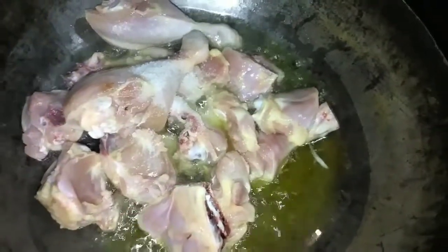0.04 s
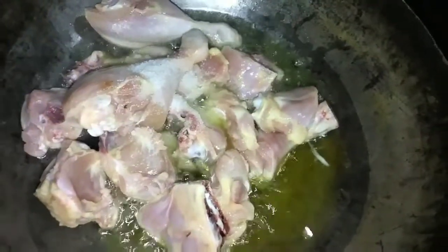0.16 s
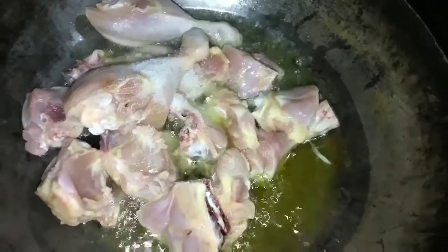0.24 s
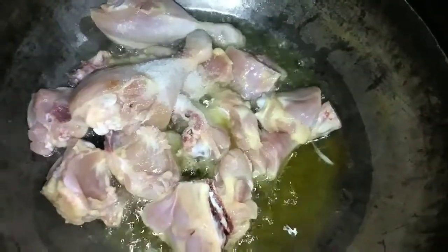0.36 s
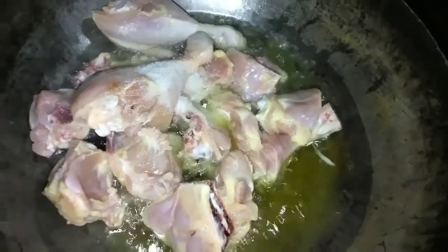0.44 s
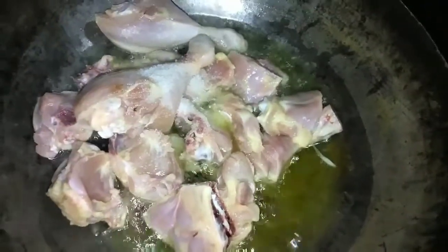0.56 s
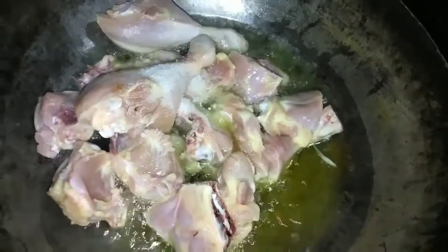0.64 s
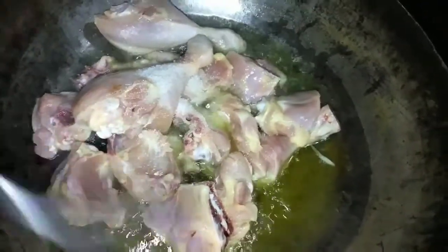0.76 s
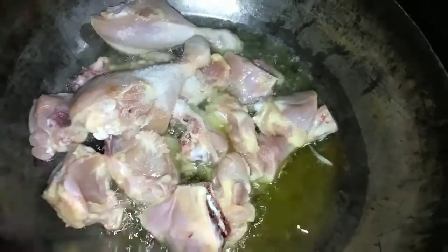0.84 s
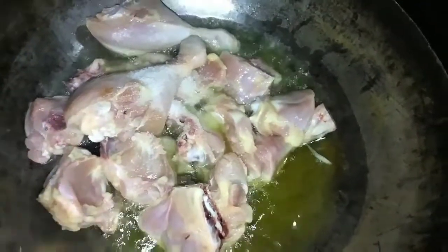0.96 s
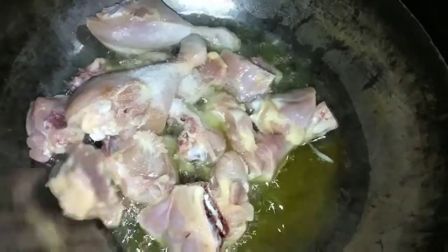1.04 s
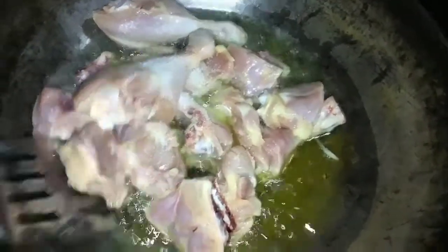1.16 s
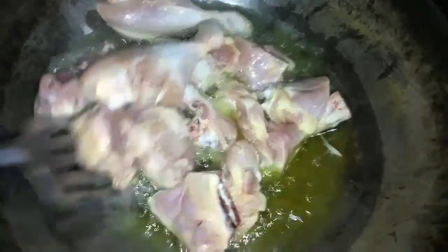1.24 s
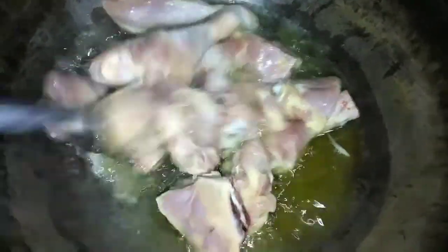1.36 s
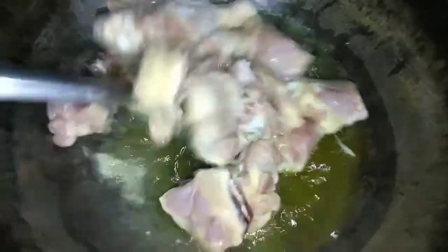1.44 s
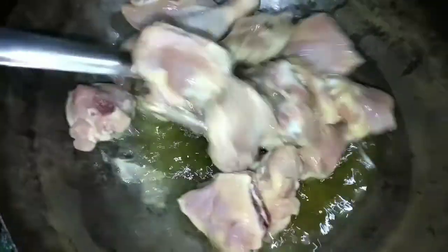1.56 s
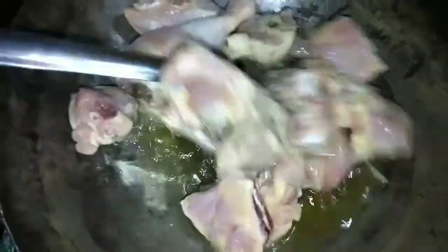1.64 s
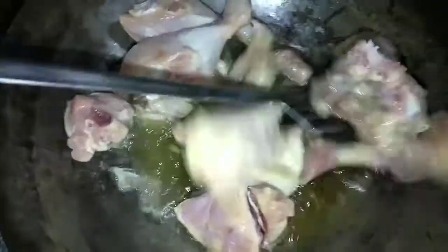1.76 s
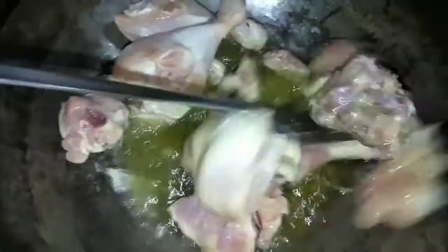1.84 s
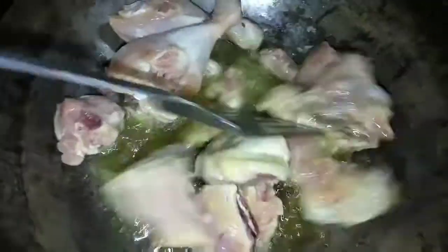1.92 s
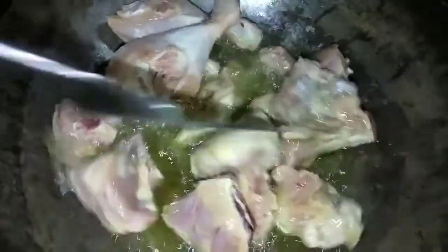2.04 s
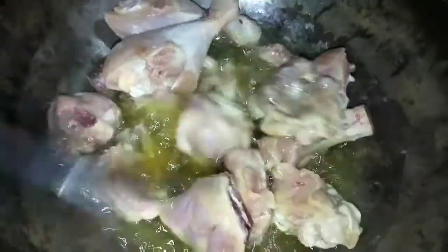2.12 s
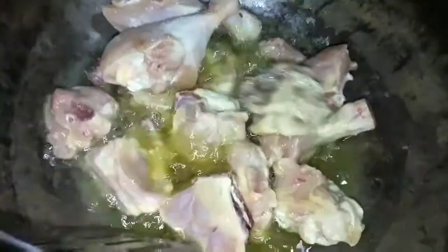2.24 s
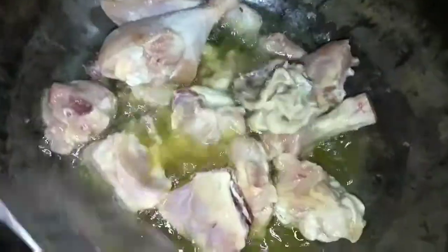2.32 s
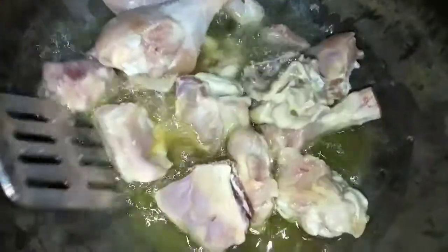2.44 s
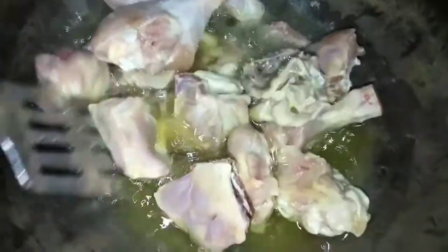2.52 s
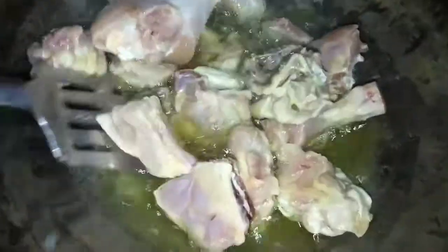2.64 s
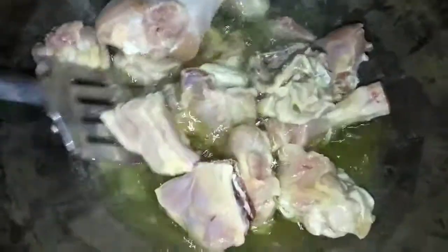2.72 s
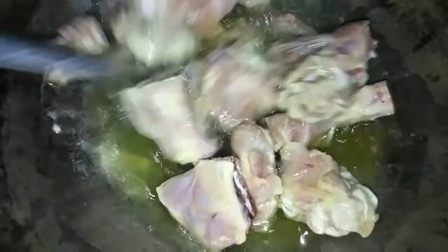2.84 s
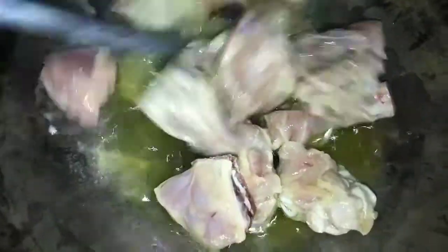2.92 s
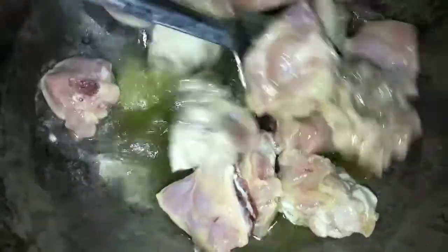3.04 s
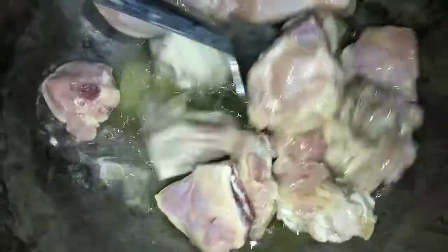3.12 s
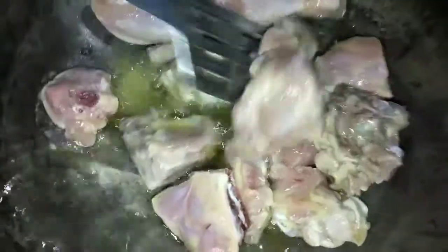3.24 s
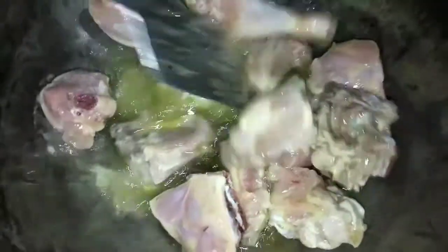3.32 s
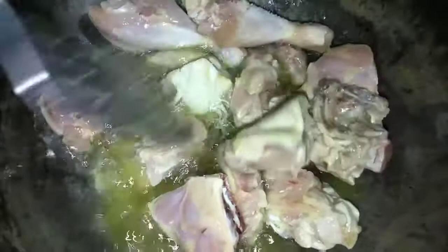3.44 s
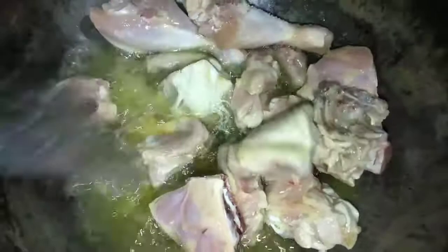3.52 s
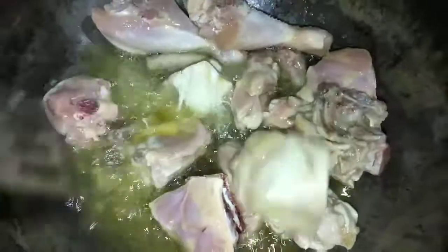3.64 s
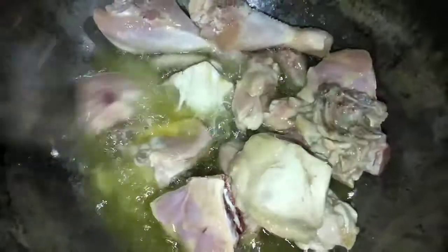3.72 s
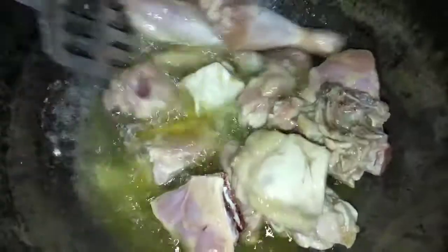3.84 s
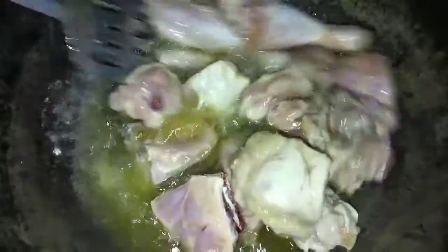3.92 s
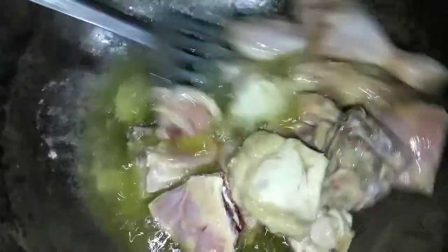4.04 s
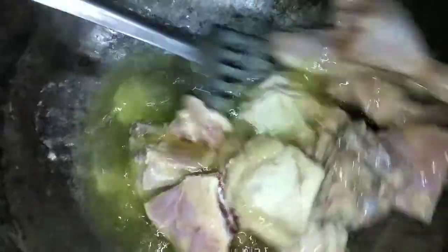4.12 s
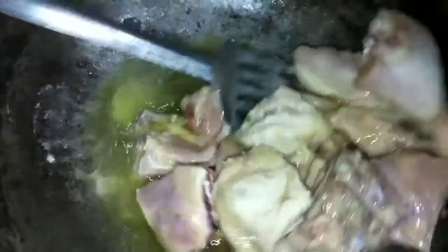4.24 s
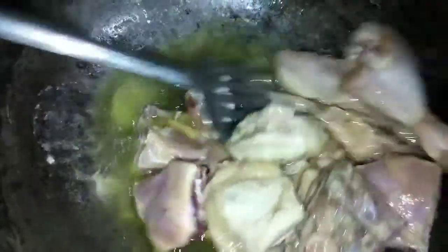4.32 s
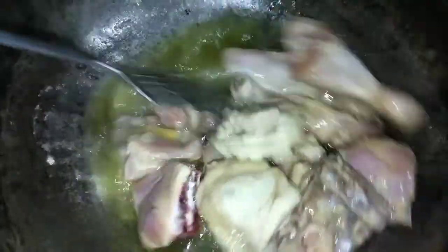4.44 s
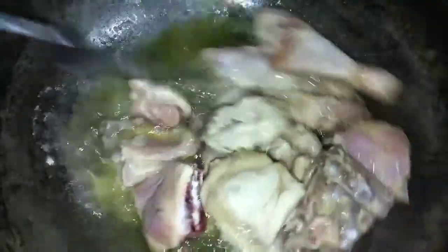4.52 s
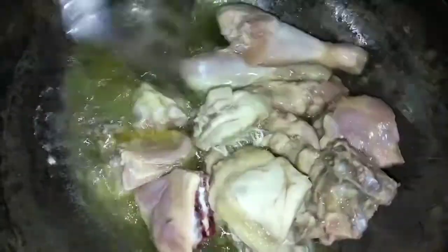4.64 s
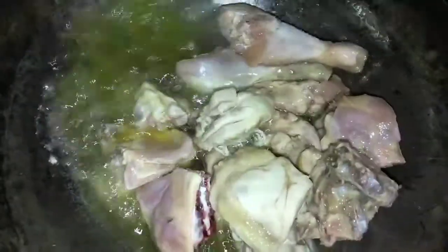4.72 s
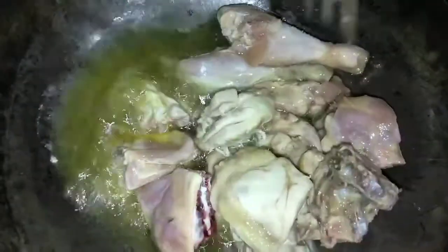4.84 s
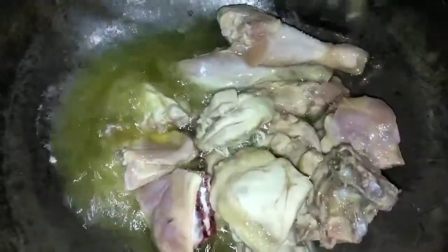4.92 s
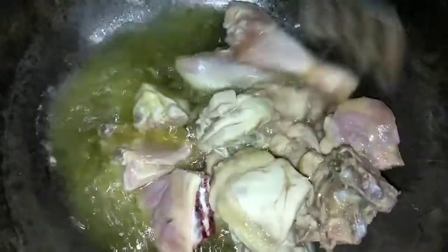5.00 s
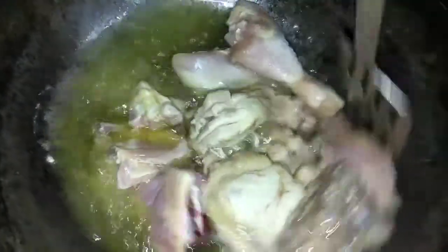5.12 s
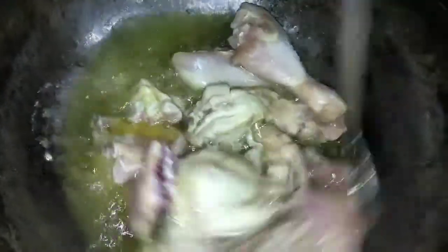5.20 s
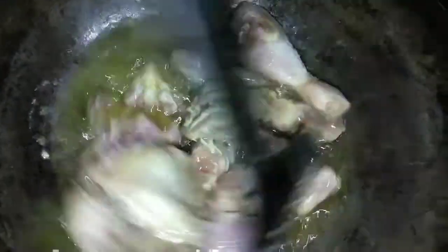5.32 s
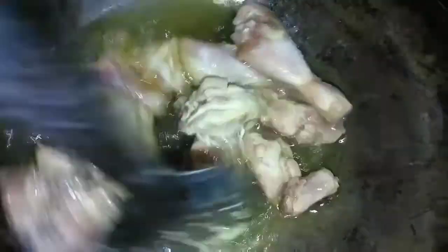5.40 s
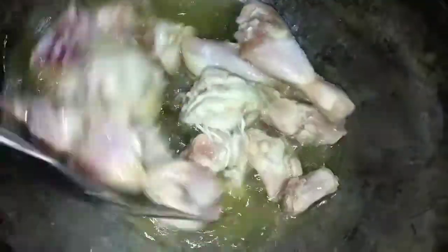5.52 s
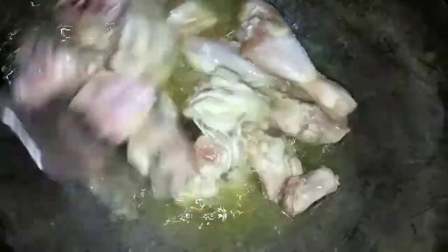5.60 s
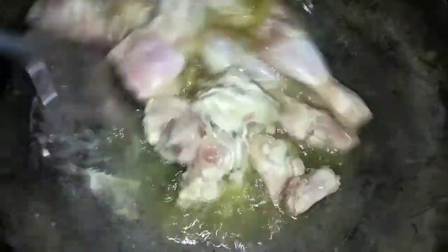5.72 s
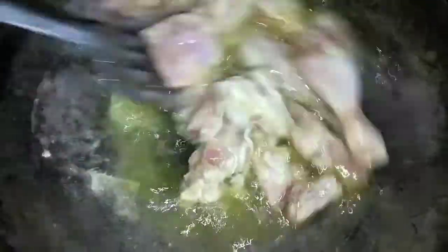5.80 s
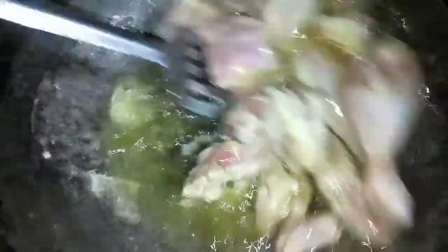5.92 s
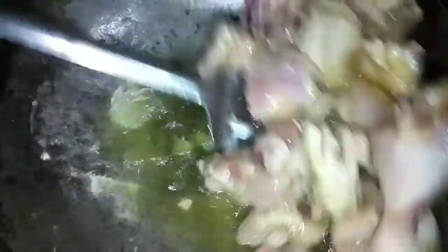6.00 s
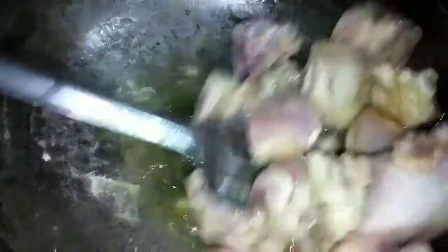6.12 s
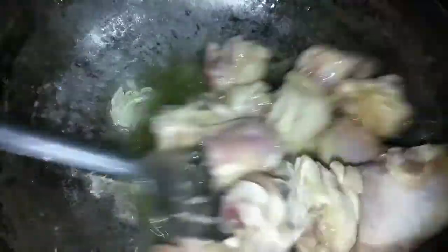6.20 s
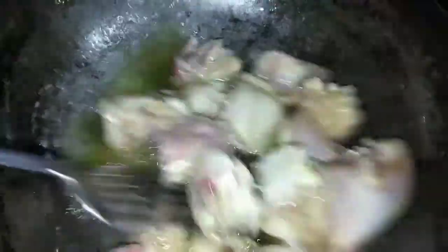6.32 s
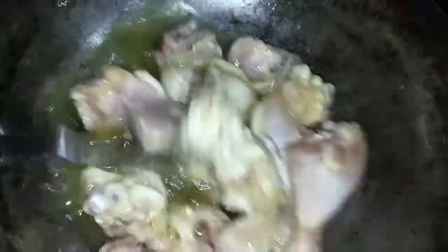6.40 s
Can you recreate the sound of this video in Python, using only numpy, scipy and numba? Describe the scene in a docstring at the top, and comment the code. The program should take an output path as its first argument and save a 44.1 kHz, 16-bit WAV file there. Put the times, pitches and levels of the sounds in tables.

```python
"""Hot fat sizzles around chicken pieces in an iron pan, heard from close above in a kitchen.
Steam bubbles burst densely, water spits, and big bubbles boil up as the pieces are turned.
A steel spatula knocks, scrapes and squeaks, ringing the iron low and its own thin blade high.
A burner roars faintly underneath. Only the treble spreads left and right."""
import sys
import numpy as np
from scipy import signal
from scipy.fft import rfft, irfft
from scipy.io import wavfile
from scipy.ndimage import uniform_filter1d
from numba import njit

SR = 44100
rng = np.random.default_rng(int(sys.argv[2]) if len(sys.argv) > 2 else 0)


def unload_wav(signal):
    """Save mono or channel-first audio to the path in sys.argv[1] as 16-bit WAV at rate SR, clipped to [-1, 1]."""
    wavfile.write(
        sys.argv[1],
        SR,
        np.round(np.clip(np.atleast_2d(signal).T, -1, 1) * 32767).astype(np.int16),
    )


N = 284886


# Spectrum of frying fat: (frequency [Hz], gain [dB])
FAT_SPECTRUM = [(150, -27.5), (250, -16.5), (420, -8), (700, -7.5), (1100, -1.5), (1500, -2), (2200, -0.5),
                (3000, -3), (4300, -4.5), (5000, -6.5), (7400, -8), (8600, -15.5), (12300, -8),
                (13400, -14)]

def fat():
    """Steam hiss, tiny crackles and bubbles of all sizes, alone and in flurries."""
    swarm = unit(bubbles(2500, lambda i, u: 700 + 11000 * u ** 1.298, cycles=3.15))
    frying = rng.standard_normal(N) + undb(-8.5) * grit(1500, 1.3) + undb(-5.5) * swarm
    return unit(colour(frying, FAT_SPECTRUM)) + undb(-8.5) * unit(colour(flurries(), FAT_SPECTRUM))


def flurries(per_s=60, bubbles_each=24, mean_delay_s=.012, low_hz=3300, high_hz=12460):
    """Droplets boil off in clusters of like-sized bubbles; a few clusters are much louder."""
    when, pitch, strength = rng.random((int(per_s * N / SR), 3, 1)).swapaxes(0, 1)
    delay, detune, share = rng.random((len(when), 3, bubbles_each)).swapaxes(0, 1)
    start = when * N - mean_delay_s * SR * np.log(1 - delay)
    hz = low_hz * (high_hz / low_hz) ** pitch * np.exp(.06 * (2 * detune - 1))
    size = (1.05 - strength) ** -.5 * share * hz / SR
    return burst(start.astype(np.int64).ravel(), hz.ravel(), np.full(hz.size, 7.), size.ravel())


# Course of the sizzle: (time [s], body [dB], small bubbles [dB], medium bubbles [dB], spatter [dB])
SIZZLE_LEVELS = [(0.0, -33.5, 3, 12.5, -48), (0.21, -32, 3.5, 10.5, -48.5), (1.1, -33, 5.5, 14.5, -49.5),
                 (1.42, -33, 5.5, 13, -48.5), (1.8, -28.5, 1.5, 7, -48), (2.2, -32.5, 4, -5, -47),
                 (2.24, -38, 5, 14.5, -50), (2.37, -36.5, 8, 12, -49), (2.43, -33.5, 8.5, 12, -49),
                 (2.64, -32.5, 6, 10.5, -44), (3.0, -30.5, 4, 2, -44), (3.42, -31.5, 2, 4.5, -43),
                 (3.79, -32.5, 1.5, 6, -50.5), (4.14, -32.5, 4.5, 7, -42), (4.6, -34.5, 8, -6, -40),
                 (4.68, -33.5, 2.5, -8, -50), (5.12, -33, 2, -2, -48), (5.79, -31, 9.5, 15, -43.5),
                 (6.2, -33.5, 4, 0, -43.5), (6.46, -33.5, 3, -13, -40.5)]
# Favoured bubble sizes, large to small: (pitch [Hz], spread [log ratio], level [dB])
BUBBLE_SIZES = [(1916, 0.104, -20.5), (3752, 0.078, -17), (6230, 0.047, -10.5)]

def sizzle(surge_db, spurt_db, flicker_db):
    """A surging body of bursting bubbles, topped by fine spatter that the spatula's rasp adds to."""
    body_db, small_db, medium_db, spatter_db = curves(SIZZLE_LEVELS)
    frying = fat()
    body, spatter = butter(frying, 4, 8200, "low"), butter(frying, 4, 8200, "high")
    finest = signal.sosfiltfilt(signal.butter(2, 10800, "high", fs=SR, output="sos"), spatter)
    spatter = spatter + (undb(flicker_db) - 1) * finest
    for (hz, spread, size_db), course_db in zip(BUBBLE_SIZES, (0, medium_db, small_db)):
        drift = .02 * walk(5)
        swarm = bubbles(1200, lambda i, u: hz * np.exp(spread * (4 * u - 2) + drift[i]), cycles=16)
        body = body + unit(swarm) * undb(size_db + course_db + 1.5 * walk(22) + .7 * walk(10))
    body_gain = undb(body_db + surge_db + .27 * spurt_db)
    spatter_gain = np.hypot(undb(spatter_db), drags(RASP)) * undb(spurt_db)
    return body * body_gain + unit(spatter) * spatter_gain


def spurts(per_s=22, decay_s=.012):
    """Gain in dB of spatter that leaps up at random and dies away."""
    kicks = (rng.random(N) < per_s / SR) * rng.random(N)
    gain = 1 + undb(-3) * signal.lfilter([1], [1, -np.exp(-1 / (decay_s * SR))], kicks)
    return 20 * np.log10(gain / np.mean(gain))


def bubbles(per_s, pitch_hz, cycles):
    """Bubbles at random times, tuned by pitch_hz(start sample, uniform draw)."""
    when, pitch, damping, strength = rng.random((int(per_s * N / SR), 4)).T
    start = (when * N).astype(np.int64)
    hz = pitch_hz(start, pitch)
    size = (1.01 - strength) ** -.3 * np.sqrt(hz / cycles)
    return burst(start, hz, cycles * (.12 + damping), size)


@njit
def burst(start, hz, cycles, size):
    """Each bubble rings as a sine that falls to 1/e in its number of cycles."""
    out = np.zeros(N)
    for k in range(len(start)):
        step = np.exp((2j * np.pi - 1 / cycles[k]) * hz[k] / SR)
        phasor = size[k] + 0j
        for i in range(start[k], min(N, start[k] + int(6 * cycles[k] * SR / hz[k]))):
            out[i] += phasor.imag
            phasor *= step
    return out


# Water pops: (time [s], level [dB], pitch [Hz])
WATER_POPS = [(0.2044, -17, 2250), (0.2514, -13, 4310), (0.2965, -31, 500), (0.3247, -18, 3550),
              (0.3844, -16, 5830), (0.4404, -17, 3660), (0.4584, -16, 3480), (0.6155, -21, 1700),
              (0.6504, -17, 6280), (0.686, -21, 1600), (1.2214, -14, 6640), (1.3169, -15, 3580),
              (1.5664, -13, 1960), (1.7345, -12, 1000), (1.8352, -13, 3850), (1.9124, -15, 3390),
              (1.9969, -14, 5990), (2.8739, -13, 2960), (2.9494, -16, 6080), (3.0494, -12, 1690),
              (3.1194, -15, 1300), (3.1894, -15, 1110), (3.3844, -16, 6030), (4.3744, -16, 6380),
              (4.5324, -16, 1870), (5.5184, -16, 1150)]

def spits():
    """Single loud pops of water in the fat."""
    time_s, db, hz = np.transpose(WATER_POPS)
    pops = burst((time_s * SR).astype(np.int64), hz, np.full(len(hz), 1.6), undb(db))
    return butter(pops, 2, 250, "high")


# Bubbling, one curve per turn of the pieces: (time [s], level [dB], pitch [Hz])
TURNS = [
    [(1.4, -43, 1900), (1.5, -32, 1980), (1.59, -28.5, 1800), (1.615, -25, 1330), (1.67, -30, 1190),
     (1.74, -33.5, 1140), (1.81, -34.5, 1270), (1.9, -35.5, 1080), (1.97, -40.5, 1170), (2.2, -56, 1270)],
    [(2.7, -49, 1710), (2.8, -34, 1870), (2.87, -31, 2690), (2.91, -34, 2500), (2.95, -31.5, 2520),
     (2.975, -36, 2380), (3.01, -30, 2250), (3.07, -31, 1730), (3.14, -33, 1010), (3.21, -32, 1040),
     (3.24, -33, 1900), (3.28, -32, 2300), (3.36, -36, 2700), (3.46, -39, 2950), (3.55, -50, 3000)],
    [(4.15, -36, 1230), (4.22, -36.5, 1110), (4.36, -39.5, 990), (4.45, -41, 970)],
    [(5.25, -36, 1170), (5.35, -34, 1140), (5.5, -33, 1127), (5.6, -41, 1470), (5.7, -35, 2690),
     (5.755, -39, 2600), (5.79, -33, 2640), (5.89, -28.5, 2760), (5.97, -33.5, 2500), (6.04, -33.5, 1280),
     (6.2, -41, 1260)],
]

def boil():
    """Big wet bubbles glide in pitch as the pieces roll over."""
    t = np.arange(N) / SR
    turning = sum((t >= turn[0][0]) & (t <= turn[-1][0]) for turn in TURNS)
    gate = uniform_filter1d(turning * 1., size=900)
    db, hz = curves(np.vstack(TURNS))
    swarm = unit(bubbles(1000, lambda i, u: hz[i] * np.exp(.3 * (2 * u - 1)), cycles=8))
    return butter(swarm * gate * undb(db + .93 * walk(35)), 2, 480, "high")


# Spatula blows: (time [s], tick [dB], pan [dB], deep ring [dB], blade [dB], clatter decay [s])
SPATULA_BLOWS = [(1.148, -10, -23, -33, -24, 0.0013), (1.17, -17, -53, -36, -30, 0.004),
                 (1.329, -34, -53, -60, -34, 0.0069), (1.814, -28, -50, -60, -32, .006),
                 (1.996, -28, -52, -60, -35, .006), (2.177, -28, -38, -56, -45, .0023),
                 (2.214, -17, -47, -58, -39, .002), (2.459, -22, -28, -31, -40, 0.0019),
                 (2.462, -34, -33, -36, -40, 0.035), (2.471, -17, -52, -58, -30, .0013),
                 (2.66, -21, -35, -46, -41, 0.0026), (2.947, -24, -43, -60, -38, 0.0033),
                 (3.277, -28, -36, -55, -50, .0036), (3.8136, -15, -27.5, -33, -17, 0.0025),
                 (3.823, -18, -34, -38, -22.5, 0.003), (3.83, -19, -41, -43, -37, .012),
                 (3.916, -26, -50, -56, -28.5, .006), (4.163, -31, -48, -62, -36, 0.0032),
                 (5.137, -25, -43, -33, -25, 0.0039), (5.206, -32, -59, -63, -41, 0.0051),
                 (5.772, -27, -37, -60, -34, 0.0025)]
TICK, PAN_HIT, DEEP_HIT, BLADE_HIT = range(1, 5)

def blows(column, decay_s=None, solid=False):
    """A jagged or solid push per blow, dying over decay_s or else its own clatter time."""
    force, n = np.zeros(N), 4000
    for blow in SPATULA_BLOWS:
        start, noise = int(blow[0] * SR), rng.standard_normal(n)
        texture = 1 if solid else noise + np.sign(noise)
        decay = np.exp(-np.arange(n) / ((decay_s or blow[5]) * SR))
        force[start:start + n] += undb(blow[column]) * texture * decay
    return force


# Spatula drags: (time [s], length [s], iron [dB], patch start [Hz], patch end [Hz],
# deep ring [dB], blade [dB], stem [dB], rasp [dB], brush [dB])
SPATULA_DRAGS = [(1.144, 0.05, -42, 1850, 1900, -42, -28.5, -43, -39, -48),
                 (1.197, 0.064, -47, 1900, 2020, -41, -29.5, -37, -44, -51),
                 (1.45, 0.15, -34, 1900, 1800, -72, -40.5, -37, -54, -48),
                 (1.591, 0.076, -26, 1700, 1900, -66, -38, -40, -50, -41),
                 (1.672, 0.086, -35, 1300, 1200, -69, -47, -39.5, -54, -52),
                 (1.783, 0.052, -35.5, 1280, 1280, -62, -51, -49, -56, -50),
                 (1.833, 0.084, -44, 1250, 1050, -59, -40, -35, -46, -48),
                 (1.943, 0.27, -62, 1600, 1800, -60, -43.5, -39.5, -50, -45),
                 (2.443, 0.049, -32.5, 1020, 1210, -37, -40, -53, -49, -52),
                 (2.498, 0.052, -42, 1800, 1900, -58, -29.5, -36, -40, -40),
                 (2.565, 0.038, -36.5, 2000, 2060, -58, -33.5, -33.5, -43, -43),
                 (2.674, 0.17, -37.5, 1730, 1800, -68, -48, -42.5, -54, -45),
                 (2.866, 0.13, -42, 2600, 2300, -68, -45, -42, -40.5, -37),
                 (2.981, 0.12, -40, 2250, 1650, -68, -37.5, -45, -43, -42),
                 (3.102, 0.092, -32, 1080, 1270, -67, -38, -44, -48, -44),
                 (3.298, 0.12, -41, 1100, 1050, -66, -40, -45, -44, -56),
                 (3.807, 0.065, -32, 920, 920, -49, -41, -53, -48, -55),
                 (3.904, 0.04, -47, 1900, 2000, -64, -30, -48, -37, -46),
                 (3.94, 0.07, -44, 1900, 1900, -64, -27, -40, -37, -45),
                 (4.14, 0.092, -33, 1820, 1820, -61, -32.5, -39.5, -50, -42),
                 (4.228, 0.043, -39, 1150, 1050, -63, -32, -37, -42, -45),
                 (4.271, 0.089, -38, 1050, 990, -70, -35, -43, -45, -44),
                 (4.492, 0.11, -37, 1290, 1600, -70, -36.5, -43.5, -55, -51),
                 (5.113, 0.11, -53, 1400, 1290, -50, -33, -50, -40, -45),
                 (5.23, 0.28, -38, 1010, 940, -45, -43, -64, -47, -53),
                 (5.46, 0.22, -34, 940, 1510, -35, -35.5, -43.5, -52, -43),
                 (5.678, 0.075, -39, 1500, 1930, -49, -31.5, -37, -46, -39),
                 (5.769, 0.095, -37, 1990, 1990, -56, -36, -37, -40, -38),
                 (5.859, 0.13, -36.5, 1990, 2010, -63, -32, -38, -38.5, -36),
                 (5.99, 0.068, -45, 1950, 2000, -65, -42, -43, -50, -50),
                 (6.057, 0.1, -40.5, 1160, 1130, -69, -37, -41, -40, -46)]
IRON, DEEP_RING, CHATTER, STEM, RASP, BRUSH = 2, 5, 6, 7, 8, 9

def drags(column, grip_s=.023, release_s=.012):
    """Gain of one layer as the edge bites, holds and lets go."""
    t = np.arange(0, N, 32) / SR
    gain = np.zeros(len(t))
    for drag in SPATULA_DRAGS:
        age_s = t - drag[0]
        release = np.exp(-np.maximum(age_s - drag[1], 0) / release_s)
        gain += undb(drag[column]) * np.clip(age_s / grip_s, 0, 1) * release
    return np.interp(np.arange(N) / SR, t, gain)


# Iron pan modes, middle and lowest: (frequency [Hz], level [dB], t60 [s])
PAN_MODES = [(623, -6.5, 0.075), (745, -6, 0.052), (853, -1, 0.11), (1000, -4, 0.15), (1129, -3.5, 0.13),
             (1286, -9.5, 0.029), (1405, -21, 0.18), (1474, -8, 0.074), (1580, -36, 0.021),
             (1798, -3.5, 0.051), (1907, 0, 0.081), (2020, -4.5, 0.071), (2127, -3, 0.087),
             (2290, -3.5, 0.054), (2785, -4.5, 0.089), (2867, -3.5, 0.051)]
DEEP_MODES = [(409, 0, .2), (428, -1, .14), (452, -3, .11), (315, -13, .07), (155, -11, .25)]

def pan():
    """Blows and stick-slip ring the iron, most in the modes near the pitch of the touched patch."""
    patch_path = []
    for time_s, length_s, _, from_hz, to_hz, *_ in SPATULA_DRAGS:
        patch_path += [(time_s, from_hz), (time_s + length_s, to_hz)]
    patch_hz, = curves(patch_path)
    shares = np.array([undb(db) * (np.exp(-.5 * (np.log(hz / patch_hz) / .1) ** 2) + .22)
                       for hz, db, _ in PAN_MODES])
    shares /= np.sqrt(np.sum(shares ** 2, axis=0))
    slip = drags(IRON) * grit(3000, 2) * undb(.62 * walk(45))
    knock = blows(PAN_HIT)
    iron = np.zeros(N)
    for share, (hz, db, t60_s) in zip(shares, PAN_MODES):
        scrape = share * slip * undb(1.04 * walk(30))  # wavers as the edge crosses nodes
        iron += mode(scrape + (share + .28 * undb(db)) * knock, hz, t60_s)
    deep_force = grit(3000, 1) * drags(DEEP_RING) + blows(DEEP_HIT, decay_s=.00034, solid=True)
    return butter(iron, 2, 450, "high") + butter(ring(deep_force, DEEP_MODES), 2, 125, "high")


# Spatula blade and stem modes: (frequency [Hz], level [dB], t60 [s])
BLADE_MODES = [(4950, -7, .015), (5170, -6, .015), (5590, -4, .02), (5830, -3, .02), (6150, 0, .03),
               (6330, -2, .02), (6500, -2, .02), (6720, -2, .02), (7060, -3, .02), (7340, -3, .025),
               (7650, -5, .02), (8020, -8, .015)]
STEM_MODES = [(3530, -2, .012), (3700, 0, .016), (3900, -2, .012), (4200, -4, .012)]

def spatula(shake_db):
    """Thin steel chatters and hisses as it drags, and rings at each blow."""
    slip = grit(7000, .35) * undb(shake_db)
    chatter = unit(sum(undb(db + 3.5 * walk(20)) * mode(slip, hz, t60_s)
                       for hz, db, t60_s in BLADE_MODES))
    brush = unit(butter(slip, 3, (4450, 5720), "band"))
    stem = ring(slip * drags(STEM), STEM_MODES)
    hit = blows(BLADE_HIT)
    spray = undb(-6) * butter(hit, 3, 8000, "high")
    return drags(CHATTER) * chatter + drags(BRUSH) * brush + stem + ring(hit, BLADE_MODES) + spray


def ticks():
    """The dry crack of steel meeting iron."""
    return butter(blows(TICK, decay_s=.0004), 2, (700, 4500), "band")


# Metal squeaks: (time [s], level [dB], start pitch [Hz], end pitch [Hz], length [s])
EDGE_SQUEAKS = [(1.243, -25, 2060, 1990, 0.046), (1.225, -29, 7200, 7140, 0.031),
                (1.471, -26.5, 1924, 1735, 0.037), (1.504, -26, 2710, 2680, 0.018),
                (1.515, -22.5, 1520, 1450, .016), (1.535, -26.5, 1996, 1995, 0.047),
                (1.599, -27, 1910, 1990, 0.03), (1.625, -29.5, 2066, 2000, 0.041),
                (1.785, -29, 1304, 1270, 0.032), (2.47, -30, 2070, 2060, .045),
                (2.533, -29, 1800, 1800, .014), (2.587, -20.5, 2050, 2000, 0.008),
                (2.596, -25, 1850, 1850, .005), (3.055, -28, 1700, 1720, .03), (3.114, -27, 880, 895, .02),
                (3.132, -28, 1650, 1650, .018), (3.405, -31, 2600, 2600, .014),
                (3.455, -29, 2950, 2950, .016), (3.81, -23.5, 1970, 1900, 0.0081),
                (3.927, -31, 2050, 2060, .018), (3.941, -23.5, 7250, 7200, 0.03),
                (3.961, -22.5, 3660, 3710, 0.034), (4.159, -29, 1830, 1810, 0.023),
                (4.162, -27, 6700, 6800, .02), (4.184, -23.5, 1800, 1830, 0.016),
                (4.207, -27, 1830, 1830, 0.028), (4.272, -29, 6300, 6440, 0.027),
                (4.362, -33, 6250, 6350, .02), (5.14, -29, 6200, 6150, 0.05), (5.2, -28, 6130, 6160, .024),
                (5.203, -33, 7620, 7640, .02), (5.256, -32, 6150, 6030, 0.039),
                (5.415, -34, 5900, 5770, .05), (5.535, -30, 6400, 6450, .03),
                (5.565, -30, 5500, 5500, .016), (5.66, -28, 6200, 6200, .014),
                (5.258, -33.5, 1376, 1260, 0.071), (5.265, -33, 965, 985, .08),
                (5.325, -31, 990, 1005, 0.08), (5.4, -33, 990, 1010, 0.12), (5.51, -39, 1225, 1390, 0.054),
                (5.56, -30.5, 1480, 1590, 0.085), (5.664, -31, 2940, 2940, 0.063),
                (5.706, -25, 6100, 6100, 0.028), (5.719, -27.5, 1800, 1950, 0.034),
                (5.77, -22.5, 2010, 1780, 0.032), (5.797, -26, 1923, 2070, 0.064),
                (5.853, -24, 1980, 2000, 0.016), (5.869, -14, 1980, 1976, 0.03),
                (5.899, -19.5, 2050, 2080, 0.018), (5.918, -18, 1900, 1900, 0.0071),
                (5.95, -24, 1990, 1950, 0.014), (5.966, -21, 1950, 1940, 0.013),
                (5.98, -16, 1920, 1930, 0.0062), (5.986, -23, 1970, 1940, 0.017),
                (6.009, -25, 1405, 1400, 0.018), (6.011, -23, 1920, 1990, 0.0097),
                (6.033, -20, 2030, 2000, 0.017), (6.048, -24.5, 1990, 1890, 0.022),
                (6.077, -28.5, 1800, 1770, 0.028)]

def squeaks():
    """The edge catches and sings in short fluttering tones; the higher, the rougher."""
    out, level, pitch, grain, jitter = np.zeros(N), walk(110), walk(220), walk(400), walk(1500)
    for time_s, db, from_hz, to_hz, length_s in EDGE_SQUEAKS:
        start, n = int(time_s * SR), int(length_s * SR)
        span, roughness = slice(start, start + n), from_hz / 6000
        wobble = .012 * pitch[span] + .035 * roughness * jitter[span]
        hz = np.linspace(from_hz, to_hz, n) + from_hz * wobble
        tone = np.sin(2 * np.pi * np.cumsum(hz) / SR)
        flutter_db = 2.6 * np.clip(level[span], -2.5, 1)
        rasp_db = 6 * np.sqrt(roughness) * np.clip(grain[span], -3, 1)
        out[span] += undb(db + flutter_db + rasp_db) * np.hanning(n) ** .4 * tone
    return out


def stove_thud(time_s=5.137, rise_s=.005, t60_s=.4):
    """The stove top gives under one blow."""
    age_s = np.maximum(np.arange(N) / SR - time_s, 0)
    return -undb(-28) * (1 - np.exp(-age_s / rise_s)) * 1000 ** (-age_s / t60_s)


# Kitchen background spectrum: (frequency [Hz], gain [dB])
KITCHEN_SPECTRUM = [(5, -15), (12, -2), (24, 2), (32, 3), (55, 0.5), (75, -12), (105, -4), (140, 0),
                    (156, 4), (175, -2.5), (235, -6.5), (262, -9), (290, -22), (430, -11.5), (730, -39)]

def kitchen(level_db=-53):
    """Burner roar and a low hum."""
    return undb(level_db + .26 * walk(3.8)) * unit(colour(rng.standard_normal(N), KITCHEN_SPECTRUM))


# Stereo side spectrum: (frequency [Hz], gain [dB])
SIDE_SPECTRUM = [(4500, -7.5), (6500, -4), (8000, -3), (10500, -2.5), (12000, -4.5), (13000, -6.5)]

def treble_spread(x, cutoff_hz=4430):
    """Side signal: treble arrives from many spots in the pan, so part of it is uncorrelated."""
    highpass = signal.ellip(8, .3, 65, cutoff_hz, "high", fs=SR, output="sos")
    return signal.sosfilt(highpass, colour(x, SIDE_SPECTRUM))


def undb(db):
    """dB to gain."""
    return 10 ** (np.asarray(db) / 20)


def unit(x):
    """Scale to rms 1."""
    return x / np.sqrt(np.mean(x ** 2))


def curves(rows):
    """Per-sample curves from (time [s], values...) rows."""
    time_s, *columns = np.transpose(rows)
    return [np.interp(np.arange(N) / SR, time_s, column) for column in columns]


def butter(x, order, hz, kind):
    """Causal Butterworth filter."""
    return signal.sosfilt(signal.butter(order, hz, kind, fs=SR, output="sos"), x)


def colour(x, spectrum):
    """Minimum-phase filter through (frequency [Hz], gain [dB]) points."""
    hz, db = np.transpose(spectrum)
    bin_db = np.interp(np.log(np.arange(4097) * SR / 8192 + 1), np.log(hz), db)
    cepstrum = irfft(bin_db * np.log(10) / 20)
    cepstrum[1:4096] *= 2
    cepstrum[4097:] = 0
    return signal.fftconvolve(x, irfft(np.exp(rfft(cepstrum))))[:N]


def walk(per_s):
    """Ramps between random levels, rms 1."""
    hold = int(SR / per_s)
    steps = np.repeat(rng.standard_normal(N // hold + 1), hold)
    return unit(uniform_filter1d(steps, hold)[:N])


def grit(per_s, spread_db):
    """Scattered clicks, many small and a few large, rms 1."""
    clicks = (rng.random(N) < per_s / SR) * rng.standard_normal(N)
    return unit(clicks * undb(spread_db * np.minimum(rng.exponential(size=N), 4.5)))


def mode(x, hz, t60_s):
    """One resonance, rms gain 1 for white noise."""
    radius = np.exp(-np.log(1000) / (t60_s * SR))
    pole = radius * np.exp(2j * np.pi * hz / SR)
    return np.sqrt(2 * (1 - radius ** 2)) * signal.lfilter([1], [1, -pole], x).imag


def ring(x, modes):
    """Modes rung by one input, weights normalised in power."""
    power = sum(undb(2 * db) for _, db, _ in modes)
    return sum(undb(db) * mode(x, hz, t60_s) for hz, db, t60_s in modes) / np.sqrt(power)


def scene():
    """Fat, spatula, pan and kitchen in the centre; independent treble on the sides."""
    surge_db = .52 * walk(12) + walk(40)
    shake_db, spurt_db, flicker_db = 1.8 * walk(50), spurts(), 2.9 * walk(12)
    mid = ticks() + sizzle(surge_db, spurt_db, flicker_db) + boil() + spits()
    mid += spatula(shake_db) + pan() + squeaks() + stove_thud() + kitchen()
    side = treble_spread(sizzle(surge_db, spurt_db, flicker_db) + spatula(shake_db) + squeaks())
    return np.array([mid + side, mid - side])


def record(dry):
    """The microphone drops the deepest bass; the top is cut steeply."""
    lowpass = signal.ellip(12, .2, 80, 13150, fs=SR, output="sos")
    return signal.sosfilt(lowpass, butter(dry, 1, 3, "high"))


dry = scene()
out = record(dry)
unload_wav(out)
```